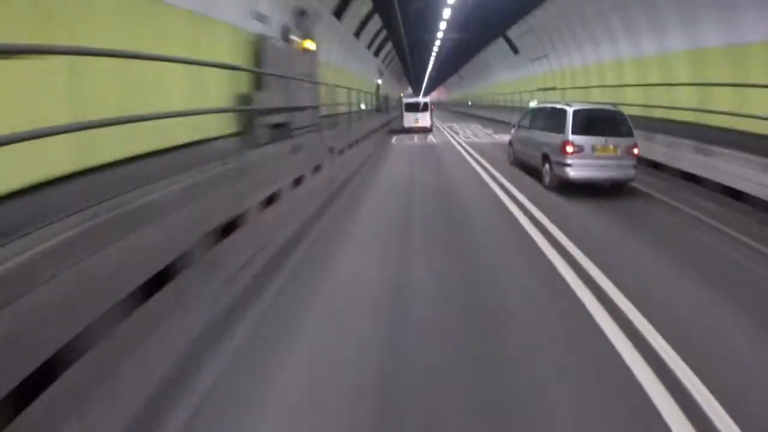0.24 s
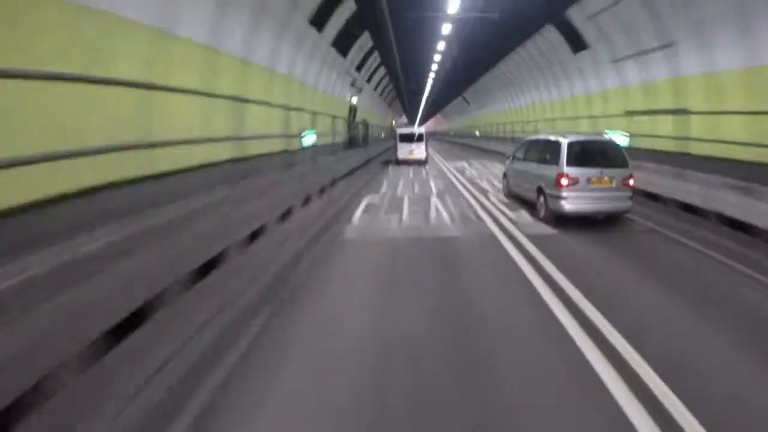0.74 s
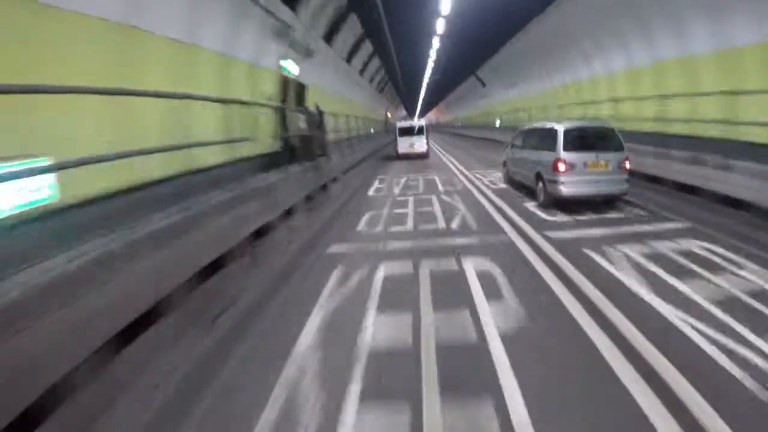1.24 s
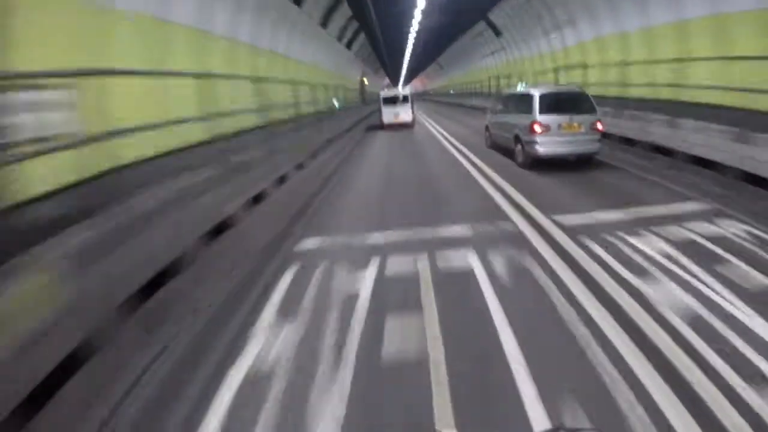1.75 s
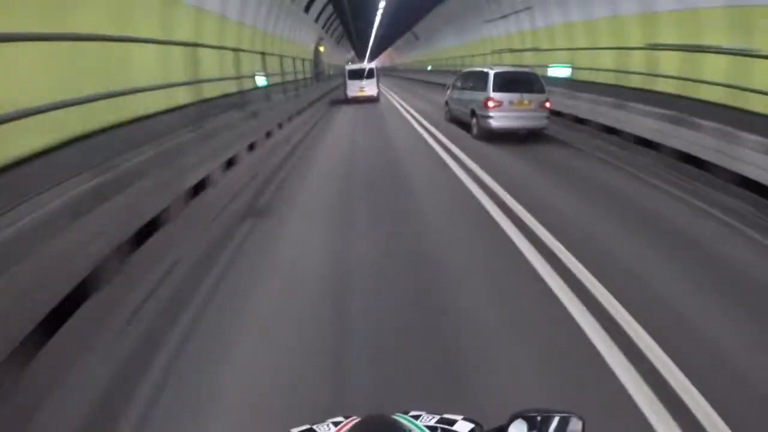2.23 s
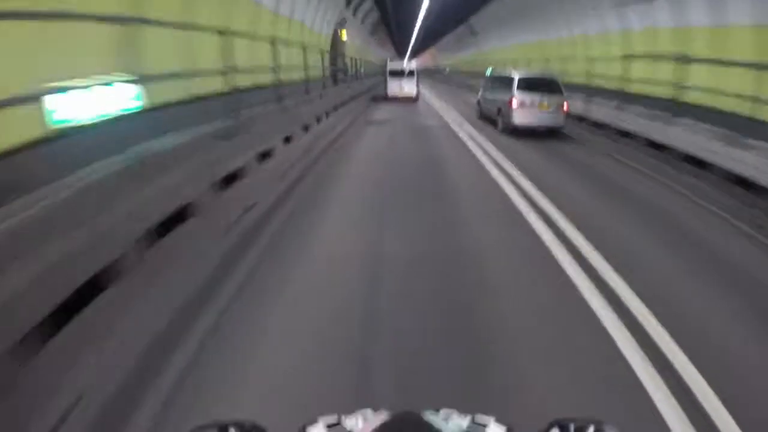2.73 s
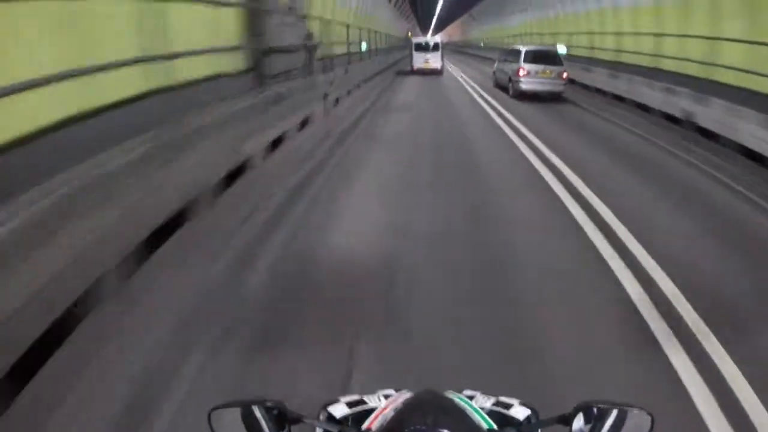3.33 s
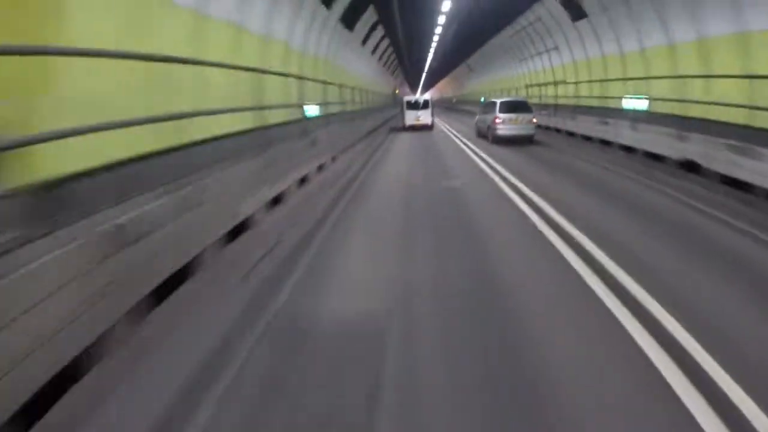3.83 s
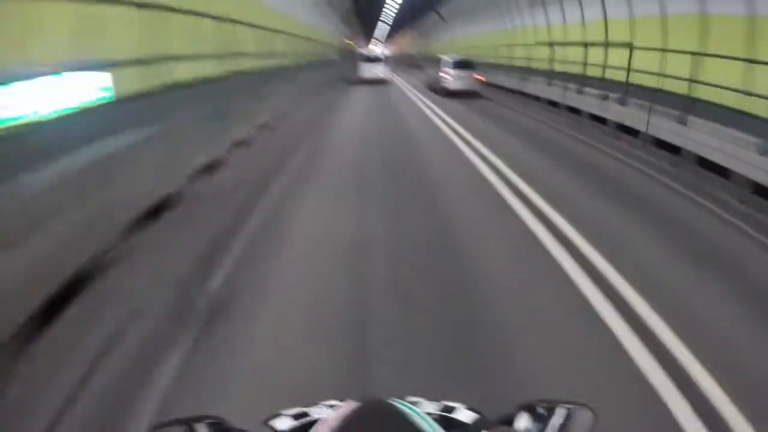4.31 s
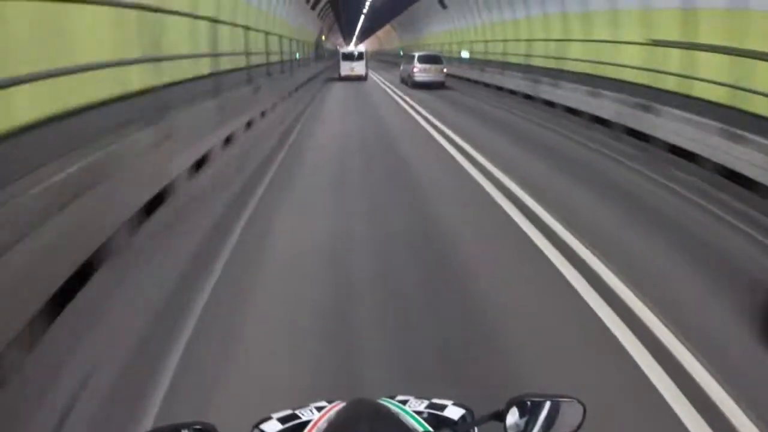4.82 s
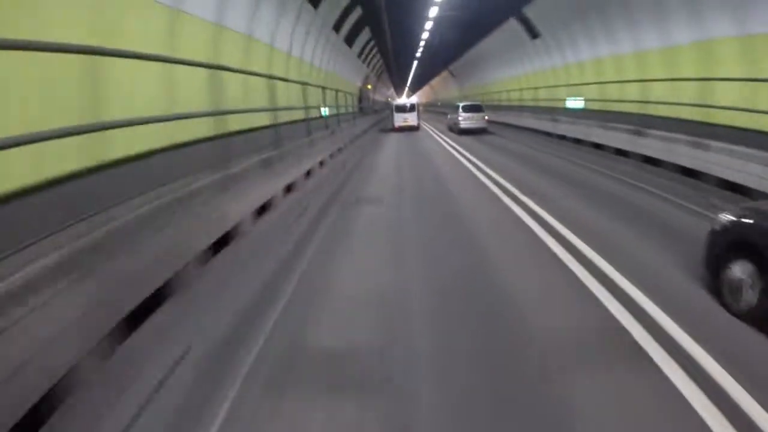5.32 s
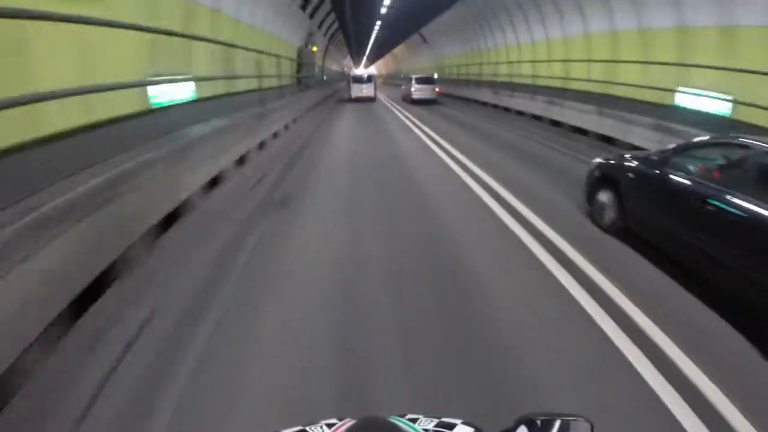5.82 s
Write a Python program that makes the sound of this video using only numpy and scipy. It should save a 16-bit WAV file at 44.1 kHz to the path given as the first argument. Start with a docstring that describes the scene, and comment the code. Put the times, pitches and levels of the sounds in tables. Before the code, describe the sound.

A microphone on a moving motorcycle catches a dense, reverberant tunnel roar and gusty low wind. The loud twin-cylinder exhaust coasts downward, wavering and popping, while gear whine sinks and fades. A sharp double rev flare marks a downshift, followed by a bright brief singing tone, a few more pops and a smoother, slowly rising engine growl with metallic casing hiss.

```python
"""A V-twin motorcycle coasts through a road tunnel: exhaust drone, sinking gear whine and pops in the pipe.
At 4.1 s the revs dip and blip for a lower gear; the tunnel rings with the blip, and a few pops follow.
Order 16 sings out at 4.58 s as the throttle opens; the casing then rings under load as the bike pulls away.
Throughout, traffic roar fills the tunnel and wind buffets the microphone. Orders are sines, pops are ringing
pulses, the rest is mostly shaped noise; a limiter ducks at each peak over its knee."""
import sys
import numpy as np
from scipy import signal
from scipy.fft import rfft, irfft, next_fast_len
from scipy.io import wavfile

SR = 44100
rng = np.random.default_rng(int(sys.argv[2]) if len(sys.argv) > 2 else 0)


def transcribe(signal):
    """Save signal, clipped to [-1, 1], as a 16-bit WAV file at the path in sys.argv[1]."""
    frames = np.atleast_2d(signal).T
    limited = np.clip(frames, -1, 1)
    pcm = np.round(limited * 32767).astype(np.int16)
    wavfile.write(sys.argv[1], SR, pcm)


N = 267246
SECOND_FIRING_CYCLES = 3 / 8   # 270 of 720 crank degrees

# Engine: (time [s], cycle rate [Hz], levels of orders 3, 5 and 8 [dB])
ENGINE = [(0, 33.57, -23.5, -35, -30), (.12, 33.86, -17, -22.5, -34), (.35, 32.99, -16.5, -20.5, -29.5),
          (.55, 32.6, -15.5, -19, -28.5), (.66, 32.1, -19.5, -26, -33.5), (.8, 31.94, -20, -17, -31),
          (.88, 31.69, -23.5, -25, -31), (.97, 31, -24, -23, -31), (1.05, 30.94, -17.5, -23.5, -32),
          (1.25, 30.83, -22, -21.5, -27), (1.36, 30.18, -26, -21, -35), (1.45, 30.02, -18.5, -25, -22),
          (1.55, 29.65, -18, -27, -25), (1.75, 29.37, -19, -19.5, -23), (1.86, 29.1, -18.5, -26.5, -28.5),
          (1.95, 28.9, -13.5, -20, -19.5), (2.08, 28.84, -18.5, -27, -19), (2.22, 28.42, -17, -35, -20.5),
          (2.36, 27.92, -20.5, -37, -43), (2.47, 27.78, -20, -32, -21.5), (2.65, 27.45, -19, -29, -20.5),
          (2.84, 26.97, -22.5, -23, -21.5), (2.94, 26.88, -29, -23, -18.5), (3.06, 26.7, -18, -30, -20),
          (3.14, 26.87, -44, -21, -36), (3.24, 26.86, -37, -18.5, -20), (3.4, 26.76, -35, -23.5, -19),
          (3.47, 26.48, -36, -18, -16), (3.55, 26.6, -33.5, -22.5, -17.5), (3.68, 26.55, -35.5, -19, -16),
          (3.76, 26.53, -32, -20.5, -20.5), (3.82, 26.65, -32, -20, -20.5), (3.87, 26.8, -33, -21.5, -20),
          (3.94, 26.78, -29, -18, -23), (4.03, 26.83, -34, -18.5, -17.5), (4.08, 25.5, -23, -33, -35),
          (4.11, 23.73, -24, -26, -32), (4.14, 23.28, -23, -27, -21), (4.17, 24.84, -27, -17, -25),
          (4.2, 26.93, -25, -15, -20), (4.23, 29.87, -28, -27, -22), (4.27, 31.84, -26, -37, -32),
          (4.32, 32.12, -23, -25, -39), (4.37, 29.07, -24, -30, -20.5), (4.41, 28.82, -17, -37, -22.5),
          (4.445, 29.25, -27, -36, -20), (4.465, 30.5, -27, -28, -42), (4.49, 31.73, -24, -31, -20),
          (4.53, 30.65, -25, -25, -28), (4.565, 29.37, -23, -31, -38), (4.6, 30.1, -32, -27, -17.5),
          (4.64, 30.55, -26, -35, -17.5), (4.7, 31.04, -28, -17, -21.5), (4.78, 29.78, -41, -19.5, -19),
          (4.88, 30.07, -30, -19, -24), (5.02, 30.6, -44, -18, -17.5), (5.18, 30.59, -29, -16.5, -22),
          (5.33, 31.01, -31, -20, -19), (5.62, 31.83, -37, -19.5, -22.5), (5.87, 32.26, -35, -26, -19),
          (6.06, 32.34, -38, -23.5, -21)]
# Orders of the cycle with levels in ENGINE: (order [per cycle])
STRONG_ORDERS = [3, 5, 8]
# Middle orders: (time [s], levels of orders 4, 6, 7, 9 and 11 [dB])
MIDDLE_LEVELS = [(0, -24, -26.5, -26.5, -49, -50), (.35, -38, -26.5, -28, -41, -45),
                 (.65, -41, -34, -33, -42, -39), (1.0, -29, -31, -27, -49, -45),
                 (1.25, -42, -53, -31.5, -31, -48), (1.55, -38, -38, -30.5, -39, -45),
                 (1.85, -34, -30, -32.5, -47, -39), (2.05, -38, -46, -33, -33, -31),
                 (2.3, -32, -42, -33, -37, -41), (2.45, -33, -33, -30, -48, -45),
                 (2.65, -29, -28.5, -40, -28, -39), (3.05, -50, -25, -28, -29.5, -42),
                 (3.25, -39, -29, -32, -26.5, -44), (3.5, -46, -36, -39, -24.5, -34),
                 (3.7, -49, -34, -55, -28, -40), (4.05, -42, -41, -46, -33.5, -41),
                 (4.25, -42, -26, -36, -45, -45), (4.45, -43, -48, -38, -48, -43),
                 (4.65, -26, -24, -23, -36, -36), (4.85, -33, -30, -32, -49, -33),
                 (5.05, -35, -27, -28, -56, -44), (5.45, -25, -24.5, -26, -41, -46),
                 (5.7, -33, -25, -22.5, -35, -37), (6.06, -45, -23.5, -24.5, -32, -39)]
# Orders with levels in MIDDLE_LEVELS: (order [per cycle])
MIDDLE_ORDERS = [4, 6, 7, 9, 11]
# Faint orders: (order [per cycle], level on shut throttle [dB], level on open throttle [dB])
FAINT_ORDERS = [(2, -47.5, -27.5), (10, -51, -48.5), (13, -44.5, -32.5)]
# Throttle: (time [s], opening [dB])
THROTTLE = [(0, -21), (4.5, -14.5), (4.62, -10.5), (4.9, -1.5), (6.06, -1)]
# Stretches of louder or softer low exhaust echo: (start [s], end [s], level change [dB])
ECHO_STRETCHES = [(-.1, 2.1, -2.5), (2.2, 3.2, 1.5), (3.3, 4.03, -6), (4.1, 4.7, -4), (4.75, 6.2, -7.5)]
# Pops in the pipe: (time [s], thump level [dB], ring [Hz], crack level [dB])
POPS = [(0.81, -1.5, 180, -37), (1.339, 2, 142, -33), (1.916, -3.5, 200, -52), (2.13, -0.5, 170, -50),
        (2.195, -8, 198, -55), (2.272, -3, 149.8, -37), (2.373, -3.5, 196.4, -50), (2.415, -9, 159, -45),
        (2.591, -10, 129.8, -52), (3.186, -3, 170, -50), (4.185, -3.5, 129.8, -50), (4.28, -1, 188, -43),
        (4.401, -4.5, 199, -45), (4.812, -9.5, 170, -48), (5.089, -5, 180, -57)]
# Blip ringing in the tunnel: (time [s], frequency [Hz], level [dB])
BLIP_RING = [(4.24, 177.1, -60), (4.28, 170.9, -13), (4.32, 167.4, -42), (4.36, 162.2, -12),
             (4.43, 159, -31), (4.48, 155.7, -20), (4.54, 150.8, -60)]
# Casing resonances: (centre [Hz], width [Hz], level at 0 dB opening [dB])
CASING = [(2797, 400, -49), (3950, 740, -47), (5345, 1100, -47), (6780, 500, -57.5), (9600, 1500, -65),
          (11800, 760, -67)]
# Gear whine: (time [s], frequency [Hz], level [dB])
WHINE = [(0, 2950, -57), (.6, 2825, -53), (.85, 2777, -56), (1.0, 2775, -50), (1.3, 2660, -50),
         (1.5, 2550, -56), (1.9, 2460, -50), (2.25, 2460, -50.5), (2.45, 2420, -54), (2.7, 2390, -52.5),
         (3.0, 2420, -54), (3.25, 2430, -54), (3.4, 2408, -63), (6.06, 2410, -74)]
# Higher companion of the whine: (time [s], frequency [Hz], level [dB])
HIGH_WHINE = [(0, 5580, -56), (.6, 5440, -58), (.9, 5426, -54), (1.3, 5330, -55), (1.7, 5248, -60),
              (2.1, 5211, -74), (6.06, 5192, -85)]
# Tunnel air: (time [s], tyre roar [dB], engine rasp [dB], high exhaust echoes [dB], wind [dB])
AIR = [(0, -30, -41.5, -27.5, -31), (.12, -27, -38.5, -23, -26), (.26, -30, -43, -28, -35),
       (.42, -29.5, -42.5, -36.5, -29), (.55, -28, -40, -28.5, -30), (.68, -28.5, -40, -25, -31),
       (.8, -25.5, -38.5, -27, -34), (.86, -28, -43, -32, -34), (.95, -27.5, -41, -23, -29),
       (1.0, -26, -37.5, -25.5, -32), (1.12, -29.5, -43.5, -32, -29), (1.21, -25, -39.5, -28, -32),
       (1.25, -28.5, -41.5, -30, -22), (1.285, -24.5, -36.5, -31.5, -27), (1.32, -29, -41.5, -31, -28),
       (1.7, -29.5, -42.5, -28.5, -40), (1.87, -28, -42, -26, -25), (2.1, -29.5, -42, -29.5, -24),
       (2.45, -33.5, -47, -31, -31), (2.7, -30.5, -44.5, -29, -31), (2.8, -30.5, -44, -28, -29),
       (2.95, -26, -41, -22.5, -32), (3.05, -27.5, -41.5, -24, -27), (3.15, -26.5, -41.5, -22.5, -22.5),
       (3.4, -31.5, -45.5, -27.5, -37), (3.95, -31.5, -42.5, -24.5, -31.5), (4.05, -31.5, -44, -32, -37),
       (4.15, -31.5, -44.5, -26, -36), (4.43, -30.5, -47, -33.5, -28), (4.62, -26.5, -39, -24, -25),
       (4.8, -29.5, -43.5, -30.5, -34), (5.3, -28.5, -42, -25, -34), (5.8, -28.5, -42.5, -28, -30),
       (6.06, -30.5, -42.5, -27.5, -35)]
# Low exhaust echo spectrum: (frequency [Hz], relative density [dB per Hz])
BOOM_SPECTRUM = [(29, -34), (50, -22.5), (110, 0), (150, 0), (185, -1), (236, 0.5), (280, -10),
                 (360, -38.5), (620, -120)]
# High exhaust echo spectrum: (frequency [Hz], relative density [dB per Hz])
BARK_SPECTRUM = [(160, -3.5), (270, -1), (323, -5.5), (476, -10), (545, -22), (600, -34), (780, -43),
                 (1320, -120)]
# Engine rasp spectrum: (frequency [Hz], relative density [dB per Hz])
RASP_SPECTRUM = [(1060, -25), (1800, 0.5), (2150, -6), (2420, -4), (3070, -7.5), (5240, -10.5), (7000, -23),
                 (9100, -60), (15400, -120)]
# Hiss above the rasp, spectrum: (frequency [Hz], relative density [dB per Hz])
HISS_SPECTRUM = [(3650, -21), (6200, -8), (7670, -4.5), (9730, -5), (11800, -9), (13800, -11.5),
                 (14900, -29)]
# Tyre roar spectrum: (frequency [Hz], relative density [dB per Hz])
ROAR_SPECTRUM = [(240, -8.5), (400, -4.5), (490, -6.5), (575, -7.5), (961, -1), (1060, -1.5), (1520, -12.5),
                 (2210, -24), (2450, -27), (3000, -29), (3900, -54.5), (6600, -120)]
# Wind spectrum: (frequency [Hz], relative density [dB per Hz])
WIND_SPECTRUM = [(7.1, -37), (12, -7.5), (48, -8), (75, -6), (98, -38), (160, -120)]
# Bursts of road hiss: (time [s], length [s], level [dB])
SWISHES = [(.1, 0.035, -48), (1.025, .03, -53), (2.599, 0.027, -59), (3.279, .04, -41.5),
           (3.416, 0.012, -45), (4.603, 0.031, -50)]
# Grit striking the housing: (time [s], peak [dB])
TICKS = [(1.3075, -27)]


def amp(db):
    """Decibels to amplitude."""
    return 10 ** (np.asarray(db) / 20)


def rms_one(x):
    """Scale to rms 1."""
    return x / np.sqrt(np.mean(x ** 2) + 1e-20)


def in_time(rows):
    """Table columns interpolated to every sample."""
    s, *columns = np.transpose(rows)
    return [np.interp(np.arange(N) / SR, s, c) for c in columns]


def drift(corner_hz):
    """Slow chance: noise through a double one-pole low-pass, spread 1."""
    step = 40   # samples per drawn value
    pole = np.exp(-2 * np.pi * corner_hz * step / SR)
    noise = rng.standard_normal(N // step + 2002)
    slow = signal.lfilter([1], [1, -2 * pole, pole * pole], noise)[2000:]   # drop the run-in
    return np.interp(np.arange(N) / step, np.arange(len(slow)), rms_one(slow - slow.mean()))


def coloured(spectrum):
    """Noise with the given spectrum, -120 dB outside it; rms 1."""
    hz, density_db = np.transpose(spectrum)
    size = next_fast_len(N)
    grid_hz = np.arange(1, size // 2 + 2) * SR / size
    shape = amp(np.interp(np.log(grid_hz), np.log(hz), density_db, left=-120, right=-120))
    return rms_one(irfft(rfft(rng.standard_normal(size)) * shape, size)[:N])


def narrow_noise(hz, width_hz):
    """Noise band riding on a fixed or moving centre; rms 1."""
    low_pass = signal.butter(2, width_hz / 2, fs=SR, output="sos")
    a, b = signal.sosfilt(low_pass, rng.standard_normal((2, N)))
    phase = 2 * np.pi * np.cumsum(hz * np.ones(N)) / SR
    return rms_one(a * np.cos(phase) + b * np.sin(phase))


def throttle_opening():
    """Throttle opening as an amplitude factor."""
    return amp(in_time(THROTTLE)[0])


def echo_change_db():
    """Level change of the low exhaust echo, faded at each stretch's ends."""
    t, fade_s = np.arange(N) / SR, .08
    return sum(db * np.clip(np.minimum(t - start, end - t) / fade_s + .5, 0, 1)
               for start, end, db in ECHO_STRETCHES)


def firing_phase(order):
    """Phase of one order when two cylinders fire unevenly in a cycle."""
    return np.angle(1 + 1.02 * np.exp(-2j * np.pi * order * SECOND_FIRING_CYCLES)) + np.pi


def firing_gate(cycle, depth, decay_per_cycle):
    """Two puffs per cycle, each dying away after its firing; rms 1."""
    first = np.exp(-decay_per_cycle * (cycle % 1))
    second = np.exp(-decay_per_cycle * ((cycle - SECOND_FIRING_CYCLES) % 1))
    return rms_one(1 + depth * (first + second))


def singing_order_db():
    """Level of order 16: it leaps up as the throttle opens, then fades to a floor."""
    after_s = np.arange(N) / SR - 4.58
    rise_db_s, fade_db_s = 200, 14
    return np.maximum(-33.5 - np.maximum(-rise_db_s * after_s, fade_db_s * after_s), -53)


def exhaust(cycle, strong_db, wander_rad):
    """Orders of the cycle as sines; wall echoes make each waver in level and phase."""
    opening = throttle_opening()
    coast_waver_db, pull_waver_db, faint_waver_db = 1.7, .8, 1.5
    waver_db = coast_waver_db + opening * (pull_waver_db - coast_waver_db)   # combustion steadies under load
    faint_change_db = 0.3 * echo_change_db()   # faint orders follow the echo in part
    orders = list(zip(STRONG_ORDERS, strong_db))
    for k, level_db in zip(MIDDLE_ORDERS, in_time(MIDDLE_LEVELS)):
        orders.append((k, level_db + faint_waver_db * drift(4.3)))
    for k, shut_db, open_db in FAINT_ORDERS:
        level_db = shut_db + opening * (open_db - shut_db)
        orders.append((k, level_db + faint_change_db + faint_waver_db * drift(5.3)))
    orders.append((16, singing_order_db()))
    out = np.zeros(N)
    for k, level_db in orders:
        phase = 2 * np.pi * k * cycle + firing_phase(k) + wander_rad * drift(8.8)
        out += np.sqrt(2) * amp(level_db + waver_db * drift(12.0)) * np.cos(phase)
    return out


def pops(turns, crack_s, low_hz):
    """Unburnt fuel goes off in the pipe: a short suction pulse that rings a turn or so, and a crack."""
    out, half = np.zeros(N), 600
    t = np.arange(-half, half) / SR
    crack_filter = signal.butter(2, 2500, "high", fs=SR, output="sos")
    cracks = signal.sosfilt(crack_filter, rng.standard_normal((len(POPS), 2 * half)))
    for (s, thump_db, ring_hz, crack_db), noise in zip(POPS, cracks):
        thump = -amp(thump_db) * np.cos(2 * np.pi * ring_hz * t) * np.exp(-(t * ring_hz / turns) ** 2)
        crack = amp(crack_db) * noise * np.exp(-(t / crack_s) ** 2)
        start = round(s * SR) - half
        out[start:start + 2 * half] += thump + crack
    return signal.sosfiltfilt(signal.butter(1, low_hz, "high", fs=SR, output="sos"), out + 1e-18)


def blip_ring():
    """The tunnel rings with the blip: one sinking tone that pulses in level."""
    hz, level_db = in_time(BLIP_RING)
    t = np.arange(N) / SR
    heard = (t > BLIP_RING[0][0]) & (t < BLIP_RING[-1][0])
    return np.sqrt(2) * heard * amp(level_db) * np.cos(2 * np.pi * np.cumsum(hz) / SR)


def casing(gate):
    """Combustion knock excites the metal resonances of the casing as the throttle opens."""
    rings = sum(amp(db + 2.0 * drift(19.0)) * narrow_noise(hz, width_hz) for hz, width_hz, db in CASING)
    return throttle_opening() * gate * rings


def gear_whine(hz, level_db, width_hz):
    """Gear mesh tone blurred by flutter and wall echoes; it comes and goes."""
    return amp(level_db + 1.2 * drift(8)) * narrow_noise(hz * (1 + .004 * drift(4)), width_hz)


def exhaust_echoes(bark_db):
    """The exhaust echoes as low boom and higher bark noise."""
    boom = amp(-25 + echo_change_db() + 2.0 * drift(28)) * coloured(BOOM_SPECTRUM)
    bark = amp(bark_db + 0.75 * drift(19)) * coloured(BARK_SPECTRUM)
    return boom + bark


def engine_rasp(rasp_db, swell, gate):
    """Rasp noise and the hiss above it, puffing with the firing; hiss grows with throttle."""
    rasp = amp(rasp_db + 1.5 * swell + 0.37 * drift(28)) * gate * coloured(RASP_SPECTRUM)
    hiss_db = rasp_db - 18 + 3 * throttle_opening() + 1.0 * swell + 1.1 * drift(30)
    return rasp + amp(hiss_db) * gate * coloured(HISS_SPECTRUM)


def tyre_roar(roar_db, swell, cycle):
    """Traffic tyre noise in the tunnel, pulsing with the engine firing."""
    gate = firing_gate(cycle, depth=0.34, decay_per_cycle=8.8)
    return amp(roar_db + 1.3 * swell + 0.33 * drift(33)) * gate * coloured(ROAR_SPECTRUM)


def hollow_band(roar_rise_db):
    """Hollow band under the roar that grows faster than it."""
    return amp(-39 + 2 * roar_rise_db) * narrow_noise(729.4, width_hz=255)


def coarse_band(roar_rise_db):
    """Coarse, wandering band near the top of the roar that breaks out as the roar rises."""
    level_db = -39 + 1.76 * roar_rise_db + 3 * drift(20)
    return amp(level_db) * narrow_noise(1086 * (1 + .05 * drift(5)), width_hz=273)


def wind_buffet(wind_db):
    """Gusty low noise of wind on the microphone."""
    return amp(wind_db + 0.8 * drift(12.0)) * coloured(WIND_SPECTRUM)


def road_bits(low_hz, high_hz):
    """Soft bursts of bright road hiss, and two-sample ticks of grit."""
    t = np.arange(N) / SR
    burst = sum(amp(db) * np.exp(-((t - s) / (length_s / 2)) ** 2) for s, length_s, db in SWISHES)
    band = signal.butter(2, [low_hz, high_hz], "band", fs=SR, output="sos")
    out = burst * rms_one(signal.sosfilt(band, rng.standard_normal(N)))
    for s, peak_db in TICKS:
        out[round(s * SR):][:2] += amp(peak_db) * np.array([1, -.7])
    return out


def scene():
    """Sum of engine, tunnel and road, one channel."""
    rate_hz, *strong_db = in_time(ENGINE)
    roar_db, rasp_db, bark_db, wind_db = in_time(AIR)
    cycle = np.cumsum(rate_hz) / SR
    swell = drift(15.0)   # slow random swell shared by roar, rasp and hiss
    gate = firing_gate(cycle, depth=0.38, decay_per_cycle=4.4)
    roar_rise_db = roar_db - roar_db.mean()
    out = exhaust(cycle, strong_db, wander_rad=.14)
    out += blip_ring()
    out += pops(turns=0.42, crack_s=0.0011, low_hz=49)
    out += casing(gate)
    out += wind_buffet(wind_db)
    out += exhaust_echoes(bark_db)
    out += tyre_roar(roar_db, swell, cycle)
    out += engine_rasp(rasp_db, swell, gate)
    out += gear_whine(*in_time(WHINE), width_hz=120)
    out += gear_whine(*in_time(HIGH_WHINE), width_hz=200)
    out += hollow_band(roar_rise_db)
    out += coarse_band(roar_rise_db)
    out += road_bits(3800, 5900)
    return out[None]


def record(dry):
    """A limiter drops the gain at each peak over its knee and lets go slowly; soft clip, top cut."""
    knee_db, ratio, release_db_s, attack_s = -4.0, 1.0, 55, 0.0006
    ceiling, stopband_hz = 0.76, 15400
    over_db = ratio * np.maximum(20 * np.log10(np.abs(dry[0]) + 1e-9) - knee_db, 0)
    slope_db = release_db_s * np.arange(N) / SR
    duck_db = np.maximum.accumulate(over_db + slope_db) - slope_db   # peak hold with linear release
    pole = np.exp(-1 / (attack_s * SR))
    limited = dry * amp(-signal.lfilter([1 - pole], [1, -pole], duck_db))
    clipped = ceiling * np.tanh(limited / ceiling)
    return signal.sosfilt(signal.cheby2(12, 70, stopband_hz, fs=SR, output="sos"), clipped)


dry = scene()
out = record(dry)
transcribe(out)
```